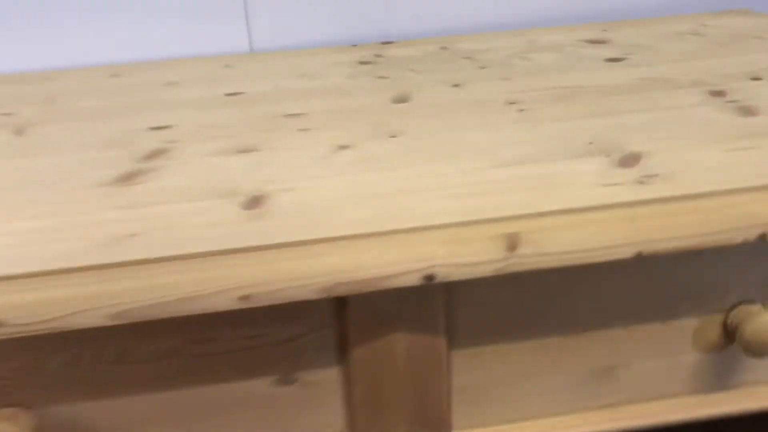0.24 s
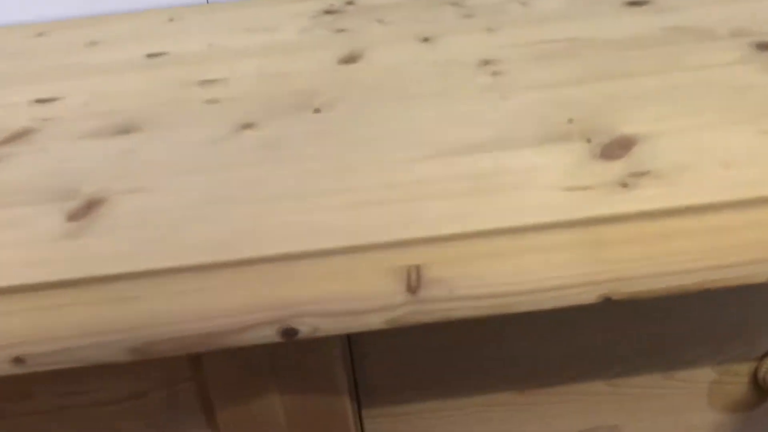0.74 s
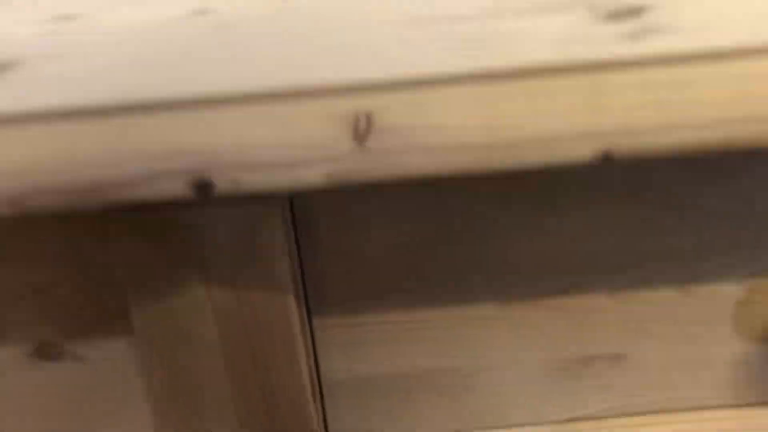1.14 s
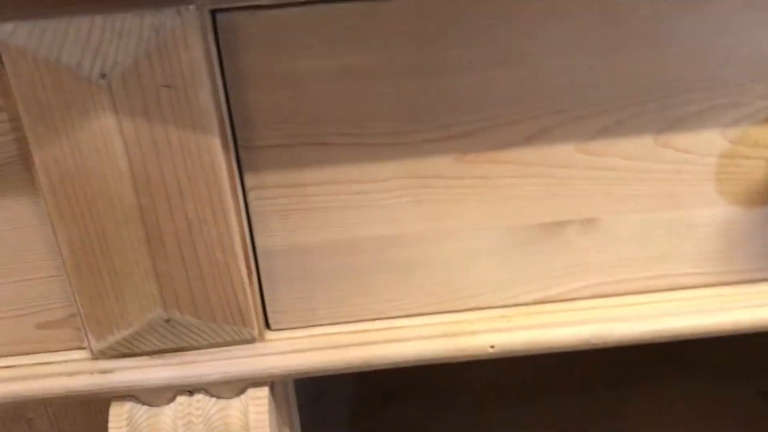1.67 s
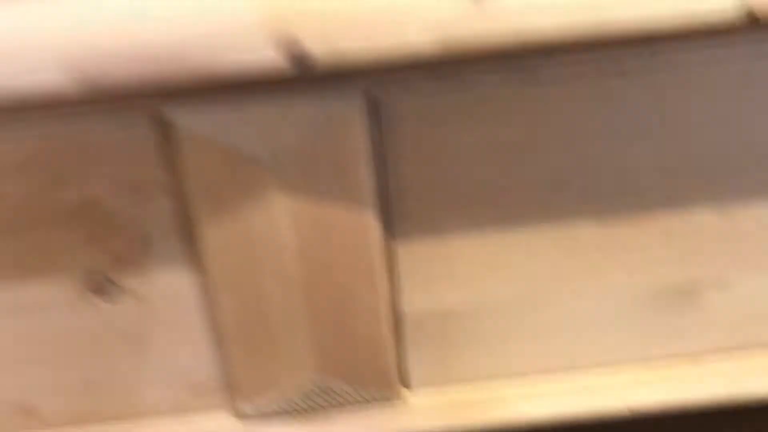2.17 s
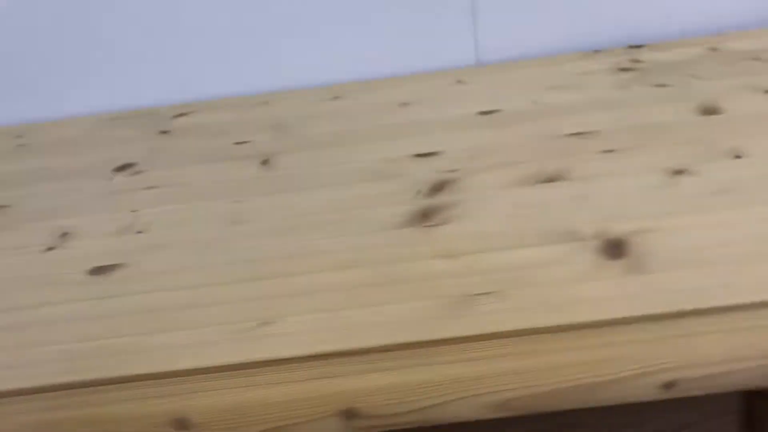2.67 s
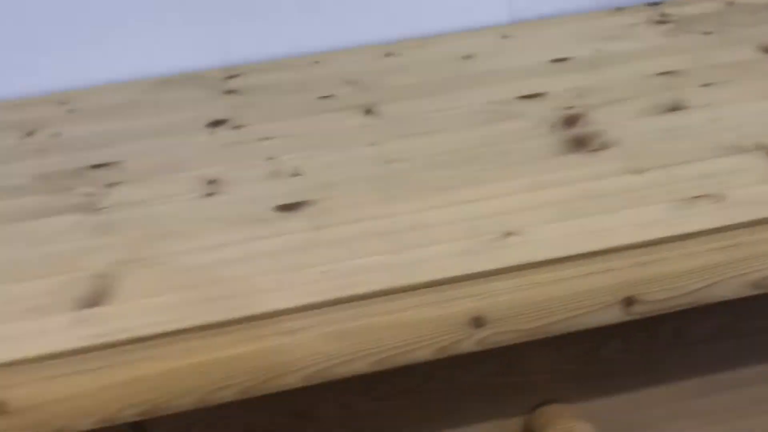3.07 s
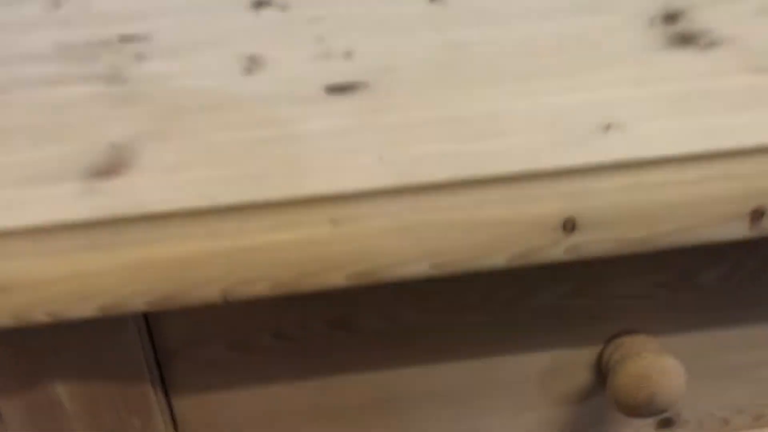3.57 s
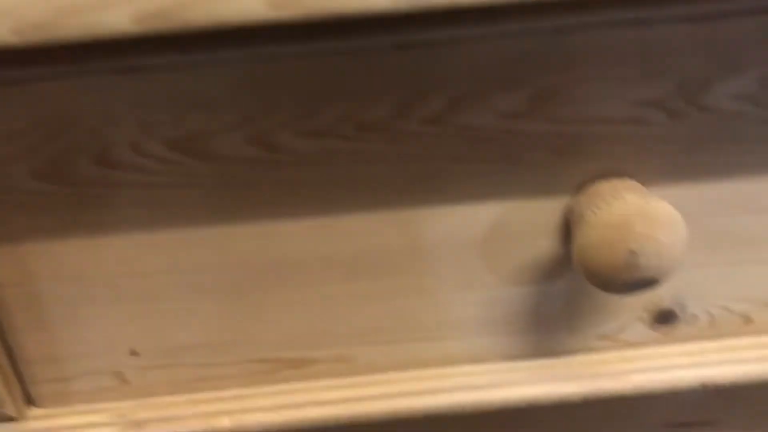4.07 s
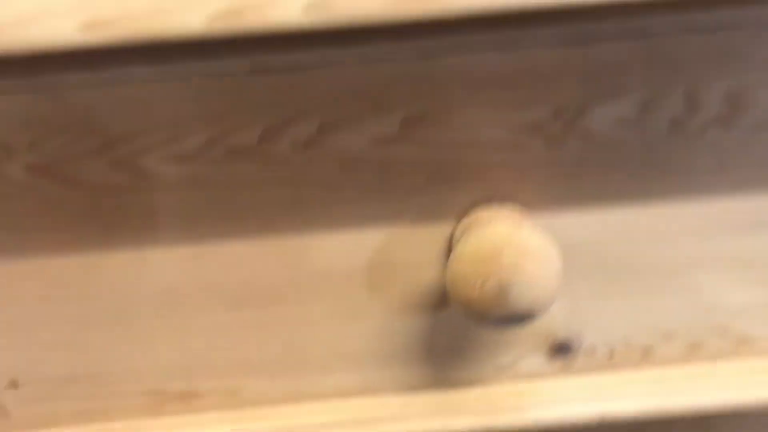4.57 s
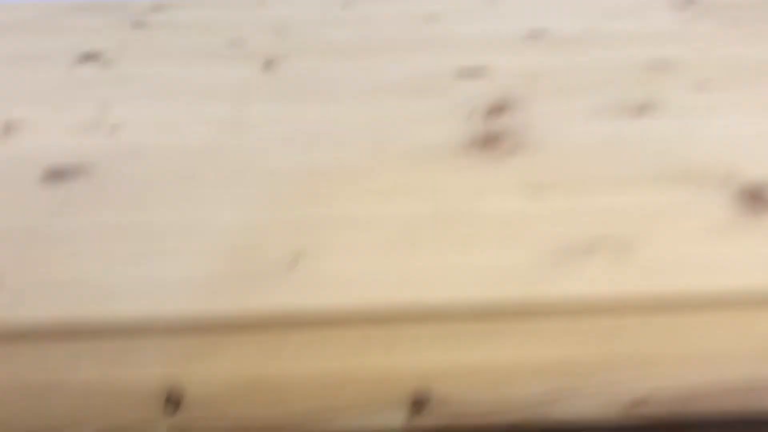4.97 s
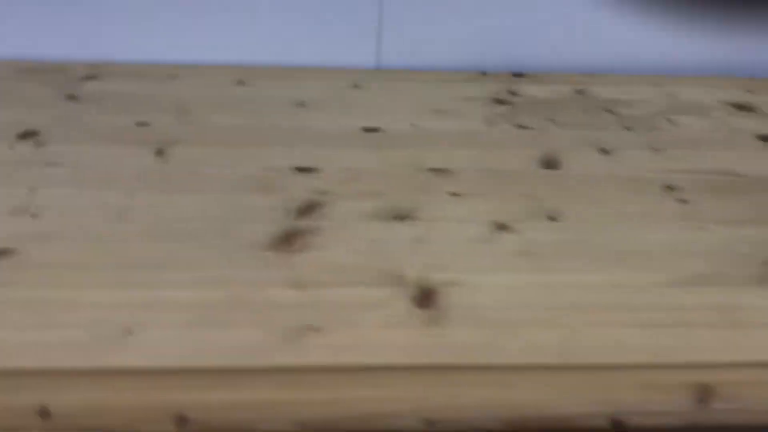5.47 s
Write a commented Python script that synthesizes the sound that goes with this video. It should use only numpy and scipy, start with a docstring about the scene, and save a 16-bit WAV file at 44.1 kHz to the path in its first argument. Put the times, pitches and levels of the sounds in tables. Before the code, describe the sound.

In a quiet hall, a pine door knocks and rebounds into its catch, then a second thuds, squeaks and snaps home amid cloth rustle.

```python
"""In a quiet warehouse, two pine cupboard doors are pushed shut by hand, one after the other.
Each thuds on the frame and rebounds: blows excite decaying panel modes and a booming carcass in a diffuse hall.
The first scrapes into its catch in gritty slips; the second squeaks as ringing noise and snaps home.
Throughout, clothes rustle and feet shift, as shaped noise with swelling levels, among small ticks and bumps.
At the end a finger brushes the microphone, in a hand that has closed round it with a hollow hiss."""
import sys
import numpy as np
from scipy import signal
from scipy.fft import rfft, irfft
from scipy.io import wavfile

SR = 44100
rng = np.random.default_rng(int(sys.argv[2]) if len(sys.argv) > 2 else 0)


def put_to_file(sound):
    """Save the sound as 16-bit audio at rate SR, in the file named by the first command-line argument."""
    columns = np.atleast_2d(sound).T  # one column per channel
    safe = np.clip(columns, -1, 1)
    whole_steps = np.round(safe * 32767)
    wavfile.write(sys.argv[1], SR, whole_steps.astype(np.int16))


N = 251896
TIME = np.arange(N) / SR  # seconds into the scene
AGE = TIME[:SR]  # seconds since the onset of one sound


def amp(db):
    """Level: decibels become a ratio of amplitudes."""
    return 10 ** (np.asarray(db) / 20)


def unit(x):
    """Normalization: the signal is scaled to an rms of one."""
    return x / np.sqrt(np.mean(x ** 2) + 1e-20)


def add(mix, s, sound):
    """Superposition: a sound is summed into the mix from a given second."""
    part = mix[round(s * SR):][:len(sound)]
    part += sound[:len(part)]


def log_frequency(size):
    """Logarithmic frequency scale of a spectrum, offset by 1 Hz to keep zero finite."""
    return np.log(np.fft.rfftfreq(size, 1 / SR) + 1)


def noise(points, size):
    """Spectral shaping: white noise is filtered to a curve of (Hz, dB) points."""
    hz, db = np.transpose(points)
    gain = amp(np.interp(log_frequency(size), np.log(hz), db))
    return unit(irfft(rfft(rng.standard_normal(size)) * gain, size))


def whistle(hz, width_hz, size):
    """Resonance: noise rings in one band, its gain halved at width_hz from the centre."""
    detune = (np.fft.rfftfreq(size, 1 / SR) - hz) / width_hz
    return unit(irfft(rfft(rng.standard_normal(size)) / (1 + detune ** 2), size))


def flutter(rate_hz, depth_db, size):
    """Random amplitude modulation: the gain wanders between random levels."""
    steps = np.arange(size) * rate_hz / SR
    levels = rng.standard_normal(size)
    return amp(depth_db * np.interp(steps, np.arange(size), levels))


def swell(peak_s, rise_s, fall_s):
    """Gaussian envelope: a smooth rise to one at a given time, and a smooth fall."""
    t = TIME - peak_s
    return np.exp(-(t / np.where(t < 0, rise_s, fall_s)) ** 2)


def cut(x, hz, kind, order=2):
    """Causal filtering: a Butterworth low-pass or high-pass."""
    return signal.sosfilt(signal.butter(order, hz, kind, fs=SR, output="sos"), x)


def lumpy(x, spacing_hz, depth_db):
    """Irregular response: uneven material favours some overtones and swallows others."""
    steps = np.fft.rfftfreq(len(x), 1 / SR) / spacing_hz
    ripple = np.interp(steps, np.arange(len(x)), rng.standard_normal(len(x)))
    ripple = np.clip(ripple, -2, 2)
    fade_in = np.minimum(steps / 10, 1)  # the lowest overtones stay more even
    return unit(irfft(rfft(x) * amp(depth_db * ripple * fade_in), len(x)))


def dying(x, bands):
    """Frequency-dependent decay: overlapping bands (Hz, dB, t60 s) of noise each die at their own rate."""
    hz, db, t60 = np.transpose(bands)
    spectrum, log_f = rfft(x), log_frequency(len(x))
    weights = [np.interp(log_f, np.log(hz), w) for w in np.eye(len(hz))]
    parts = irfft([spectrum * weight for weight in weights], len(x))
    decay = np.exp(-np.log(1000) * TIME[:len(x)] / t60[:, None])
    return (parts * amp(db[:, None]) * decay).sum(0)


def thump(hz, swell_s):
    """Damped oscillation: a few heavy cycles swell and die."""
    u = AGE / swell_s
    return -u * np.exp(1 - u) * np.sin(2 * np.pi * hz * AGE)


# spectrum of the still air. Each row: frequency in Hz, relative level in dB
AIR = [(15, -38), (25, 12.5), (50, -9.5), (164, -4.5), (433, -10), (523, -2.5), (722, -15), (970, -24),
       (2560, -16.5), (10600, -18.5), (15500, -22)]
AIR_DB = -68.5
# a faint whine that sinks and fades
WHINE_HZ, WHINE_SAG_HZ_PER_S = 6165, 137
WHINE_DB, WHINE_PEAK_S, WHINE_FADE_S = -75.5, 0.58, 0.79


def background():
    """Stationary noise and a gliding tone: still air, and a thin whine whose phase sums its falling frequency."""
    hz = WHINE_HZ - WHINE_SAG_HZ_PER_S * TIME
    tone = np.sin(2 * np.pi * np.cumsum(hz) / SR)
    whine = amp(WHINE_DB) * swell(WHINE_PEAK_S, WHINE_FADE_S, WHINE_FADE_S) * tone
    return amp(AIR_DB) * noise(AIR, N) + whine


# spectrum of cloth rubbing. Each row: frequency in Hz, relative level in dB
CLOTH = [(120, -27), (200, -10), (292, -6), (451, -7), (581, -7.5), (696, -2.5), (980, -5.5), (1310, -7.5),
         (1850, -10.5), (2420, -12), (3940, -17), (8720, -23.5), (15000, -24.5)]
# swishes, one for each movement. Each row: time of the height in seconds, level in dB, half length in seconds
SWISHES = [(.4, -64.5, 0.35), (1.145, -67.5, 0.29), (2.334, -58.5, 0.067), (2.634, -68.5, 0.045),
           (3.0, -56.5, .16), (3.265, -61.5, .06), (3.476, -63, 0.057), (4.658, -61.5, 0.12),
           (5.13, -61.5, 0.15)]
STIR_DB = -72.5  # clothes are never quite still


def clothes():
    """Friction noise: cloth rubs on cloth, and the powers of the movements add."""
    rub = noise(CLOTH, N) + amp(-9.5) * whistle(905, width_hz=220, size=N)  # a soft, hoarse centre
    power = amp(STIR_DB) ** 2
    for s, db, half_s in SWISHES:
        power = power + (amp(db) * swell(s, half_s, half_s)) ** 2
    return np.sqrt(power) * rub * flutter(rate_hz=36, depth_db=1.8, size=N)


# spectrum of low rumble. Each row: frequency in Hz, relative level in dB
RUMBLE = [(15, -9), (35, 12.5), (70, 3), (120, -2), (200, -13), (400, -22.5), (1500, -61)]
# thuds of shifting feet and grip. Each row: start in seconds, level in dB, swell in seconds, lowest frequency in Hz
SHIFTS = [(.2, -61.5, .03, 28), (2.05, -56, .07, 22), (2.42, -63, .03, 40), (2.82, -53, .06, 72),
          (3.01, -49.5, .045, 30), (3.25, -61, .05, 35), (3.41, -53.5, .065, 45), (5.03, -54.5, .06, 20),
          (5.2, -58, .06, 28), (5.545, -52, .025, 50)]
SHIFT_SPAN = 3.2  # highest over lowest frequency of a thud
SWAY_DB = -71  # steady rumble of the hand holding the microphone


def shifts():
    """Band-limited rumble: each shift of weight swells and dies over the sway of the hand."""
    out = amp(SWAY_DB) * noise(RUMBLE, N)
    for s, db, swell_s, low_hz in SHIFTS:
        u = AGE / swell_s
        thud = cut(noise(RUMBLE, SR), low_hz, "high")
        thud = cut(thud, SHIFT_SPAN * low_hz, "low")
        add(out, s, amp(db) * unit(thud) * (u * np.exp(1 - u)) ** 2)
    return out


# ticks and faint pings. Each row: start in seconds, level in dB, frequency in Hz, width in Hz, decay in seconds
TICKS = [(0.422, -47.5, 2770, 1200, 0.0025), (0.547, -42, 4800, 1300, 0.0013),
         (1.332, -57, 1066, 50, 0.022), (2.174, -59, 2290, 680, 0.0033), (2.915, -41, 4800, 724, 0.0014),
         (2.951, -47.5, 6800, 3500, 0.012), (2.983, -42.5, 6600, 2300, 0.0033),
         (2.996, -43.5, 7000, 4600, 0.0024), (3.467, -61, 396, 11, .06), (3.691, -50.5, 2400, 2500, 0.0016),
         (5.14, -62.5, 7600, 350, .017), (5.34, -35, 11900, 3500, .0016), (5.344, -44, 4480, 460, 0.0046),
         (5.574, -25.5, 4360, 1710, 0.00042)]
# soft bumps of fingers on wood and casing. Each row: start in seconds, level in dB, frequency in Hz
BUMPS = [(0.555, -45, 112), (0.697, -42, 170), (1.428, -50, 124), (2.915, -48, 145), (5.115, -40, 182),
         (5.14, -42, 164), (5.339, -36.5, 116), (5.573, -37.5, 327)]
BUMP_SWELL_S = 0.0016


def taps():
    """Transient response: dry ticks decay in narrow or wide bands, soft bumps are damped oscillations."""
    out = np.zeros(N)
    for s, db, hz, width_hz, decay_s in TICKS:
        add(out, s, amp(db) * whistle(hz, width_hz, SR) * np.exp(-AGE / decay_s))
    for s, db, hz in BUMPS:
        add(out, s, amp(db) * thump(hz, BUMP_SWELL_S))
    return out


def burst(bands, size=1024):
    """High modal density: a dying crowd of overtones, its first samples scaled to a deviation of one."""
    crowd = lumpy(rng.standard_normal(SR // 2), spacing_hz=110, depth_db=4)
    x = dying(crowd, bands)
    return np.pad(x / np.std(x[:size]), (0, SR - len(x)))


# slow resonances of the hollow carcass. Each row: frequency in Hz, width in Hz, level in dB
CARCASS = [(65.2, 2.3, -0.5), (106.6, 1.8, -11.5), (116.4, 4.3, -1)]


def carcass(x):
    """Cavity resonance: the hollow body booms on after a thump."""
    out = x
    for hz, width_hz, db in CARCASS:
        b, a = signal.iirpeak(hz, hz / width_hz, fs=SR)
        out = out + amp(db) * signal.lfilter(b, a, x)
    return out


# blows of each door. Each row: start in seconds, force in dB, hardness (low-pass) in Hz,
# lowest excited frequency in Hz, frequency in Hz of one partial that sings with the blow,
# its level in dB relative to the panel modes, edge click in dB relative to the force,
# thump in dB, thump frequency in Hz, gain into the hall in dB
LEFT_BLOWS = [(.7215, -20.5, 1420, 131, 422.4, 5.5, -20.5, -17.5, 100, 4),
              (.8305, -23, 1120, 179, 424.5, 5.5, -26.5, -24, 98, 2),
              (.912, -42.5, 589, 150, 571, -5, -21, -31.5, 117, 1),
              (1.4635, -22.5, 1280, 154, 430, 2.5, -23.5, -20, 107, -1.5),
              (1.544, -31.5, 1020, 173, 272.4, 15, -46, -23, 86, -17),
              (1.560, -28, 970, 198, 432, 7, -26.5, -30, 74, 5),
              (1.610, -32, 736, 180, 292, 3, -29, -29, 111, -2.5),
              (1.822, -28.7, 1400, 162, 433, 5, -37, -28.5, 118, 3.5),
              (1.884, -50, 1010, 151, 571, 0, -7, -33, 78.5, 7.5)]
RIGHT_BLOWS = [(3.8865, -25, 1560, 138, 555.3, 6.5, -63, -28.5, 81, 1.5),
               (4.0522, -25.5, 2780, 1050, 1878, -1, -27, -58, 80, 0),
               (4.1515, -29, 2140, 970, 1130, -12, -17.5, -46, 70, -1),
               (4.1875, -18.5, 2450, 348, 1056, 0.5, -43, -18, 68.4, 2.5),
               (4.202, -22.5, 1865, 216, 531, 0.5, -24.5, -23.5, 104, 4),
               (4.438, -42.5, 600, 145, 241, 4, -13.5, -28, 66, 6.5),
               (4.508, -26.5, 2960, 870, 1136, -4, -14, -36, 73, 1),
               (4.529, -36.5, 1290, 385, 1080, -6, -17, -50, 108, 0)]
# panel modes of each door.
# Each row: frequency in Hz, relative level in dB, t60 in seconds before the damping of the blow
LEFT_MODES = [(117, -9, .45), (236.8, -5.5, 0.38), (272.5, -5.5, 0.52), (383.7, -4, 0.29), (443, -18, 0.16),
              (549, -1, 0.32), (574, -4, 0.35), (638, -11, 0.15), (783, -20, 0.32), (928, -24, 0.42),
              (1063, -4, 0.27), (1178, -10, 0.11), (1454, -13.5, 0.091), (1506, -5, .12), (2220, -25, .15),
              (2474, 0.5, 0.1)]
RIGHT_MODES = [(151.8, 0, 0.33), (185.7, -7, 0.65), (248.6, -5.5, 0.45), (290.8, -5.5, 0.47),
               (393, -3, 0.38), (425, -4.5, 0.26), (529.5, -6, 0.23), (592, -8, 0.25), (635, -5.5, 0.14),
               (712, -2.5, 0.19), (762, -6, 0.2), (795, -7, 0.21), (885, -8.5, .24), (1062, 0.5, 0.1),
               (1169, -16, 0.49), (1254, -24, 0.25), (1612, -9, 0.18), (1866, -8, 0.19), (2162, -10, 0.14),
               (2660, -16.5, 0.08)]
# short-lived overtones of the boards, and click of edge on edge.
# Each row: frequency in Hz, relative level in dB, t60 in seconds before the damping of the blow
BOARDS = [(150, 5.5, 0.41), (261, 6, 0.29), (338, -4.5, 0.16), (448, -1.5, 0.41), (800, -5, 0.16),
          (1200, -3.5, 0.12), (1870, -5.5, 0.097), (2670, -4.5, 0.073), (3660, -18.5, 0.24),
          (7000, -15, 0.072)]
EDGE = [(1200, 9.5, .1), (3780, 5, 0.28), (6500, -1.5, 0.22), (11000, -5, 0.28), (16000, -9, .09)]


def door(blows, modes, ring_db, swell_s, crack_db, sing_cycles, damping):
    """Modal excitation: blows ring the panel and pump the air inside; returns direct sound and hall input."""
    direct, spread = np.zeros(N), np.zeros(N)
    hz, db, t60 = np.transpose(modes)[:, :, None]
    ringing = amp(db) * np.exp((2j * np.pi * hz - np.log(1000) / t60) * AGE)
    contact = 1 - np.exp(-AGE / .0016)
    for (s, force_db, hard_hz, low_hz, partial_hz, partial_db,
         click_db, thump_db, thump_hz, hall_db) in blows:
        phases = np.exp(2j * np.pi * rng.random(hz.shape))
        panel = (phases * ringing).real.sum(0)
        # the point of contact sets one partial singing; a high one dies sooner
        singing = np.sin(2 * np.pi * partial_hz * AGE) * np.exp(-AGE * partial_hz / sing_cycles)
        panel += amp(partial_db) * singing
        crack = amp(crack_db) * rng.standard_normal(SR) * np.exp(-AGE / .003)
        # a low hardness makes the blow duller
        wood = cut(burst(BOARDS) + amp(ring_db) * panel + crack, hard_hz, "low")
        # a light snap leaves the low modes still and dies sooner
        knock = cut(wood, low_hz, "high") + amp(click_db) * burst(EDGE)
        knock *= np.exp(-AGE * damping * low_hz)
        boom = carcass(thump(thump_hz, swell_s))
        blow = amp(force_db) * knock * contact + amp(thump_db) * boom
        add(direct, s, blow)
        add(spread, s, amp(hall_db) * blow)
    return np.array([direct, spread])


# decay of the hall. Each row: frequency in Hz, level in dB, t60 in seconds
HALL = [(50, -17.5, 0.35), (115, -11, 0.69), (250, -13.5, 0.75), (550, -8.5, 0.62), (1200, -9, 0.57),
        (3000, -6.5, 0.46), (8000, -5, 0.32), (15000, -13, .3)]


def hall(x, build_s):
    """Diffuse reverberation: convolution with a noise tail that builds up as the walls answer."""
    build_up = 1 - np.exp(-(TIME[:2 * SR] / build_s) ** 2)
    tail = dying(rng.standard_normal(2 * SR), HALL) * build_up
    return signal.fftconvolve(x, tail / np.sqrt(SR / 20))[:N]


# slips of the catches. Each row: start in seconds, level in dB, length in seconds, ringing frequency in Hz,
# ring in dB relative to the grit
SLIPS = [(1.762, -43, 0.03, 1720, -24.5), (1.789, -37.8, 0.034, 1690, -6),
         (1.832, -34.5, 0.024, 4500, -12.5), (1.869, -42.5, 0.025, 3170, -2.5),
         (1.892, -47, 0.019, 3010, 9.5), (1.936, -54.5, 0.024, 1700, 2.5), (4.339, -53, 0.038, 4110, -2),
         (4.35, -52, 0.059, 1990, 3.5), (4.41, -45, 0.029, 1660, -2)]
# spectrum of the grit. Each row: frequency in Hz, relative level in dB
CATCH = [(300, 8), (900, -1.5), (1700, 8), (2400, -3.5), (3400, -1), (4500, -4), (5300, -8), (6600, -8),
         (9000, -14.5), (15000, -22.5)]


def catches():
    """Dry friction: a catch grinds in short gritty slips, each with a ring of its own."""
    out = np.zeros(N)
    for s, db, length_s, ring_hz, ring_db in SLIPS:
        grit = lumpy(noise(CATCH, SR), spacing_hz=160, depth_db=4.5)
        grit = grit * flutter(rate_hz=600, depth_db=4, size=SR)
        ring = whistle(ring_hz, width_hz=87, size=SR)
        ring += amp(-11) * whistle(1.48 * ring_hz, width_hz=70, size=SR)
        pressure = np.minimum(AGE / .002, 1) * np.exp(-(AGE / length_s) ** 2)
        add(out, s, amp(db) * (grit + amp(ring_db) * ring) * pressure)
    return out


# resonances of the squeak. Each row: frequency in Hz, width in Hz, relative level in dB
SQUEAK_TONES = [(4700, 68, -13), (8120, 45, 4), (8100, 65, 3), (8700, 50, -2), (7720, 270, 8.5),
                (12090, 180, 2.5), (15350, 450, -5)]
# the tight door catches, flares and dies back to a thin tone until it snaps home
SQUEAK_S, SQUEAK_END_S, SQUEAK_RISE_S, SQUEAK_FALL_S = 4.442, 4.52, 0.0048, .009
SQUEAK_DB, SQUEAK_HOLD_DB = -32, -21  # the thin tone is relative to the flare


def squeak():
    """Stick-slip friction: the tight edge gives a shrill, fluttering squeak of narrow resonances."""
    tones = unit(sum(amp(db) * whistle(hz, width_hz, SR) for hz, width_hz, db in SQUEAK_TONES))
    chatter = 1 + 0.27 * np.sin(2 * np.pi * 225 * TIME)
    t = TIME - SQUEAK_S
    flare = np.exp(-abs(t) / np.where(t < 0, SQUEAK_RISE_S, SQUEAK_FALL_S))
    hold = amp(SQUEAK_HOLD_DB) * (t > 0) * (TIME < SQUEAK_END_S)
    return amp(SQUEAK_DB) * np.resize(tones, N) * chatter * (flare + hold)


# spectrum of the hiss inside a cupped hand. Each row: frequency in Hz, relative level in dB
HOLLOW = [(120, -10), (250, -1.5), (360, 4), (500, -10.5), (850, -1.5), (1300, -17.5), (2200, -11.5),
          (6500, -14.5), (12000, -15.5), (16000, -30)]
# a hand closes round the microphone and stays there
GRIP_S, GRIP_CLOSE_S, GRIP_DB = 4.56, 1.0, -57
# spectrum of skin sliding on the casing. Each row: frequency in Hz, relative level in dB
SKIN = [(500, -22), (3200, -15), (4600, 4.5), (5800, -13), (8500, -7), (11500, 6.5), (14000, -15),
        (16000, 4)]
# the finger creeps, speeds up into one short stroke and lifts off
BRUSH_S, BRUSH_DB, BRUSH_RISE_S, BRUSH_LIFT_S = 5.537, -36.5, 0.033, 0.024
CREEP_DB, CREEP_S = -14.5, .11  # level relative to the stroke


def handling():
    """Contact noise: a closing hand adds a hollow hiss, and a dragged fingertip grows louder with its speed."""
    creep = np.exp(np.minimum(TIME - BRUSH_S, 0) / CREEP_S) * (TIME < BRUSH_S)
    speed = swell(BRUSH_S, BRUSH_RISE_S, BRUSH_LIFT_S) + amp(CREEP_DB) * creep
    brush = amp(BRUSH_DB) * speed * noise(SKIN, N) * flutter(rate_hz=720, depth_db=3.5, size=N)
    closed = np.clip((TIME - GRIP_S) / GRIP_CLOSE_S, 0, 1)
    return brush + amp(GRIP_DB) * closed * noise(HOLLOW, N)


def scene():
    """Direct and reverberant fields: doors and catches sound in the hall, the small sounds close by."""
    left = door(LEFT_BLOWS, LEFT_MODES, ring_db=-7.5, swell_s=0.0083,
                crack_db=-12, sing_cycles=11.0, damping=0.022)
    right = door(RIGHT_BLOWS, RIGHT_MODES, ring_db=-5.5, swell_s=0.0089,
                 crack_db=-5, sing_cycles=30.0, damping=0.023)
    direct, spread = left + right
    friction = catches() + squeak()
    room = hall(spread + amp(1) * friction, build_s=0.008)
    close_by = background() + clothes() + shifts() + taps() + handling()
    return (direct + friction + room + close_by)[None]


CUTOFF_HZ = 15900


def record(dry):
    """Band limitation: the microphone sheds the deepest bass, then a steep low-pass ends the treble."""
    thinned = cut(dry, hz=28.3, kind="high")
    lowpass = signal.firwin(511, CUTOFF_HZ, window=("kaiser", 9), fs=SR)
    return signal.oaconvolve(thinned, lowpass[None], "same")


dry = scene()
out = record(dry)
put_to_file(out)
```